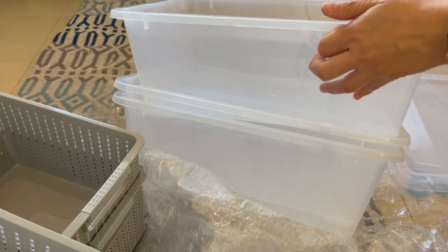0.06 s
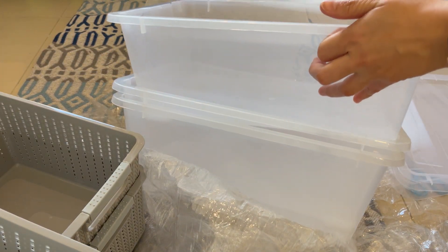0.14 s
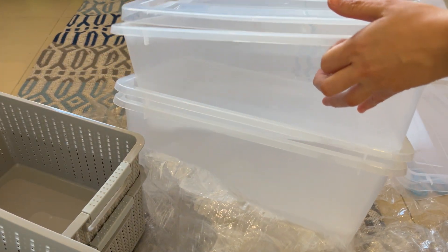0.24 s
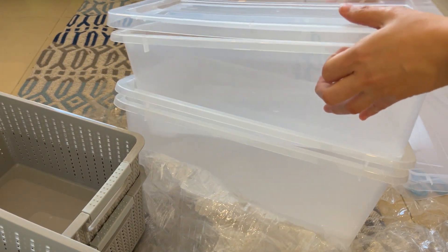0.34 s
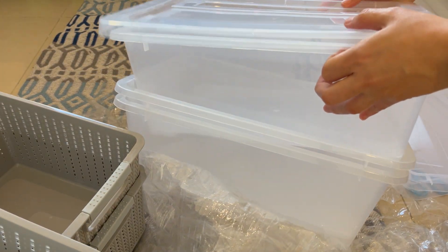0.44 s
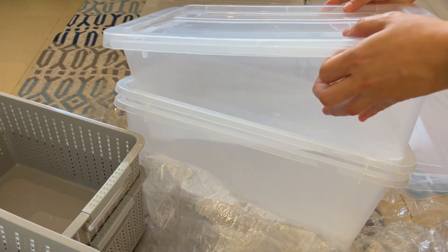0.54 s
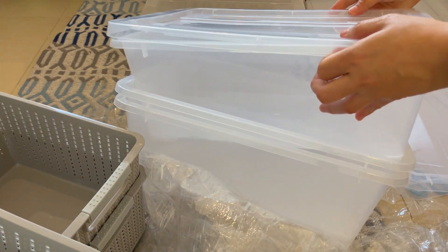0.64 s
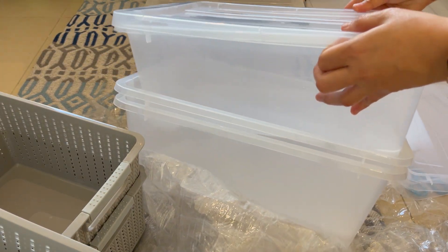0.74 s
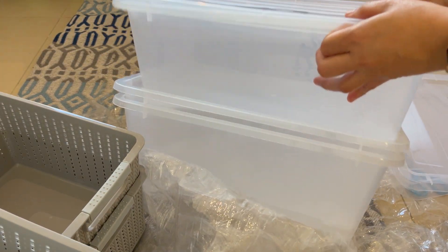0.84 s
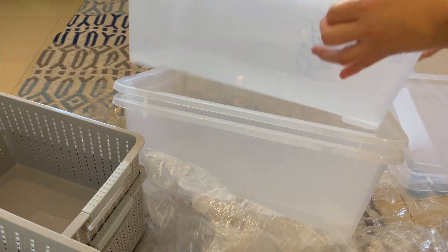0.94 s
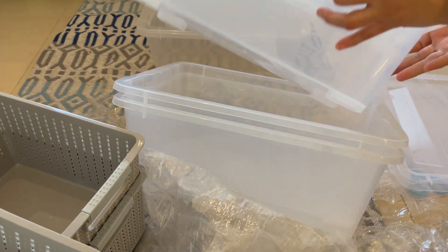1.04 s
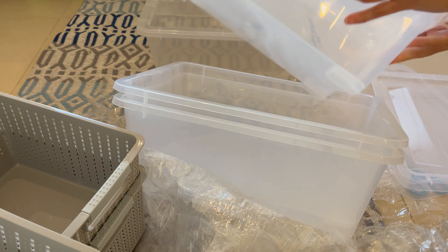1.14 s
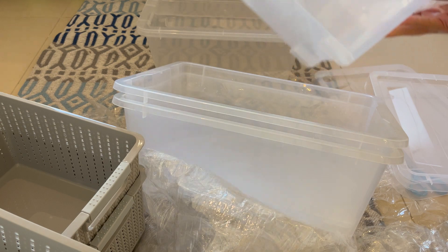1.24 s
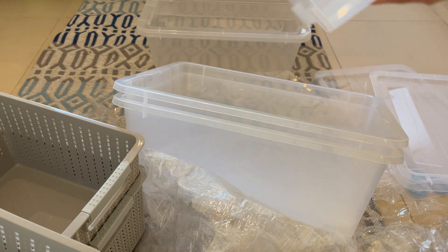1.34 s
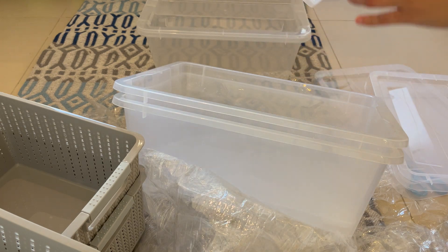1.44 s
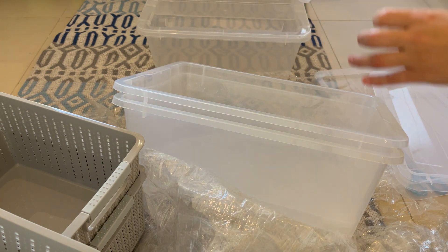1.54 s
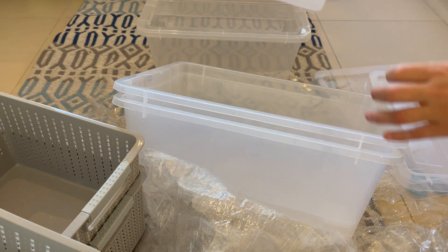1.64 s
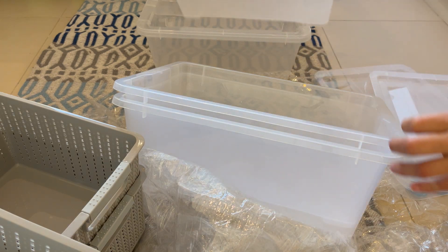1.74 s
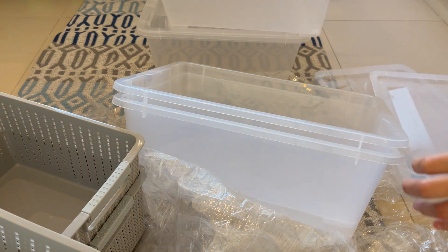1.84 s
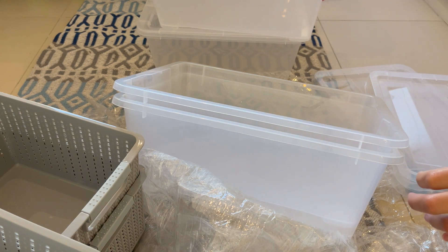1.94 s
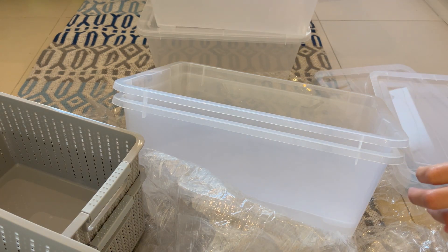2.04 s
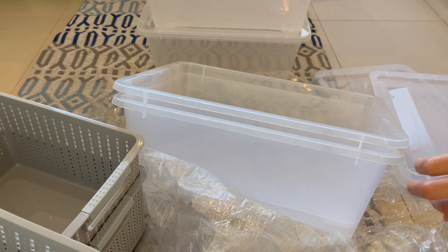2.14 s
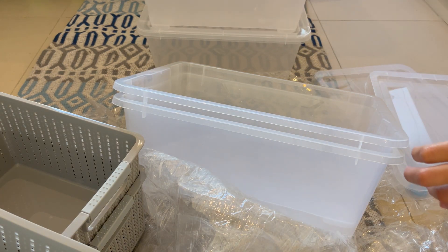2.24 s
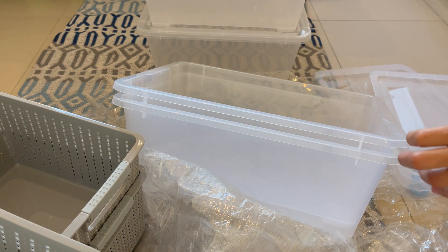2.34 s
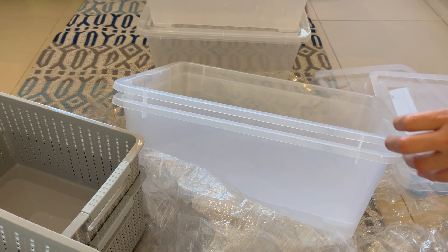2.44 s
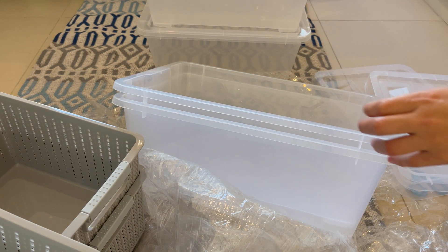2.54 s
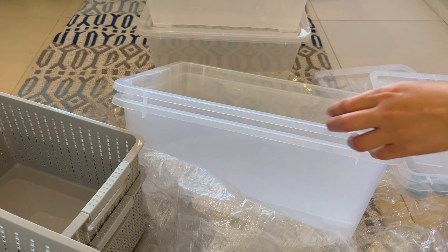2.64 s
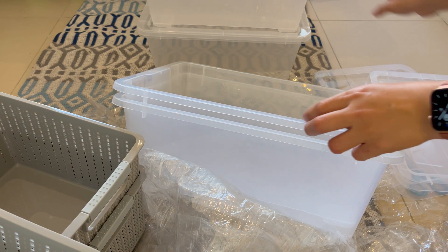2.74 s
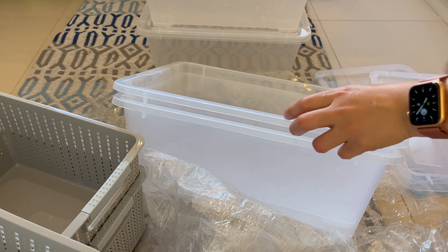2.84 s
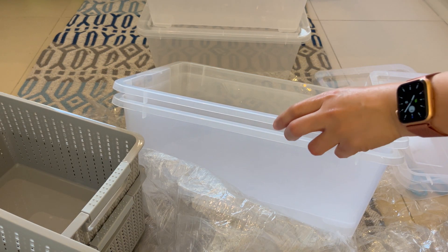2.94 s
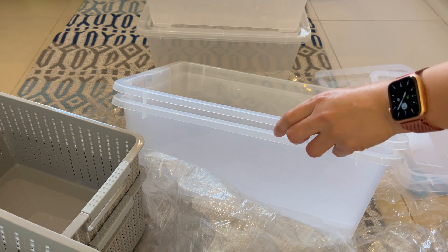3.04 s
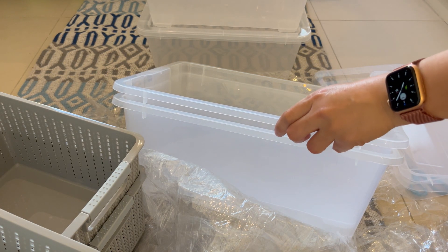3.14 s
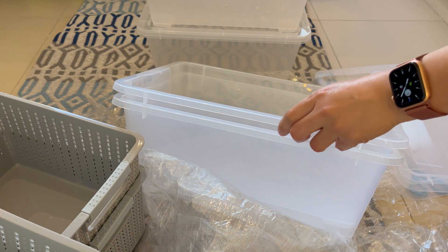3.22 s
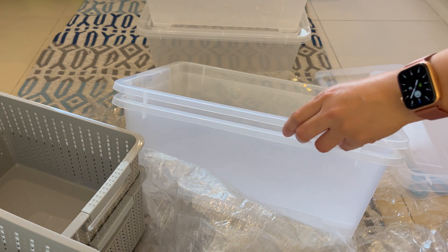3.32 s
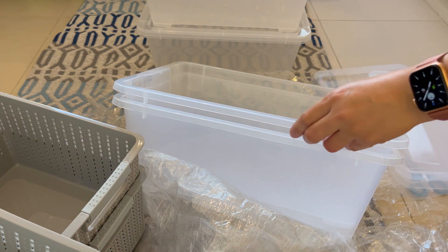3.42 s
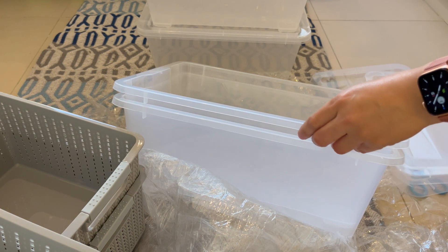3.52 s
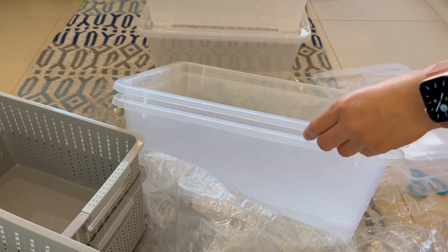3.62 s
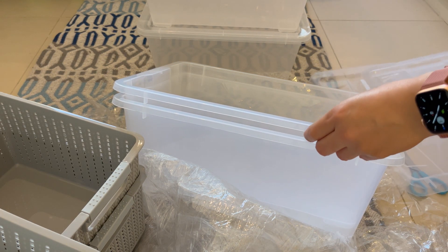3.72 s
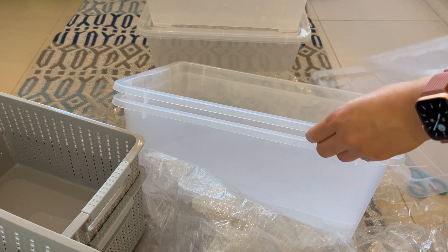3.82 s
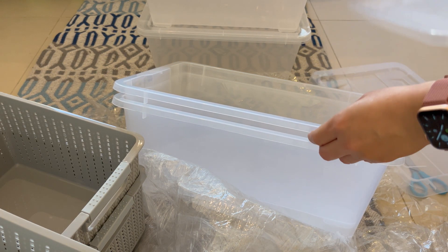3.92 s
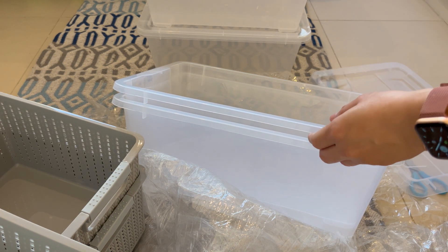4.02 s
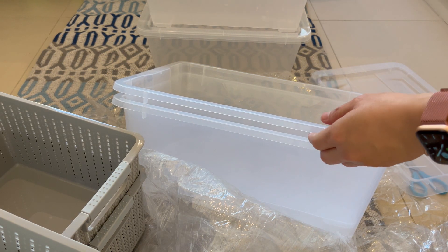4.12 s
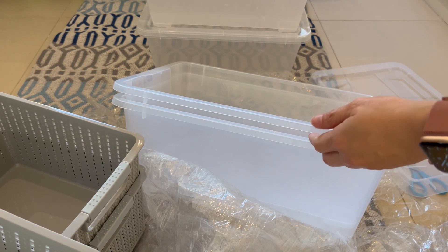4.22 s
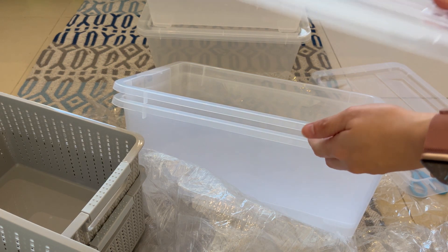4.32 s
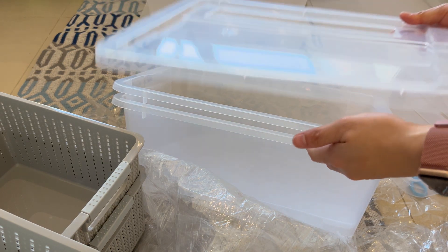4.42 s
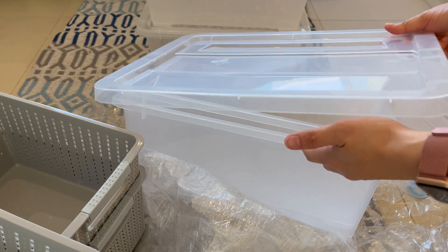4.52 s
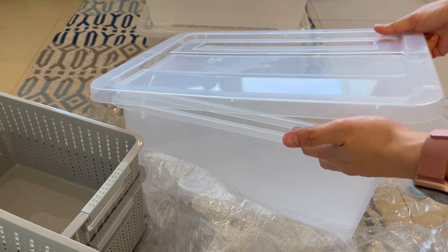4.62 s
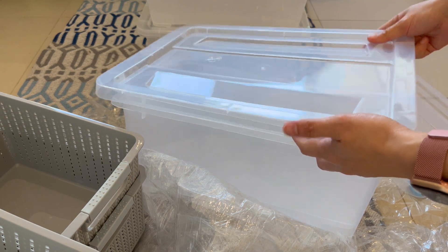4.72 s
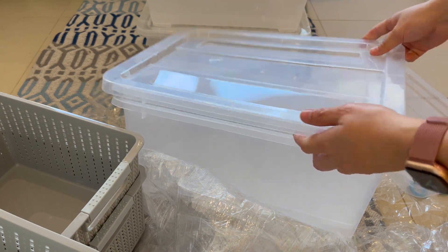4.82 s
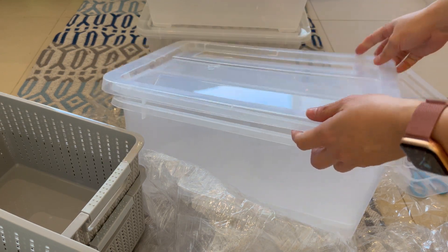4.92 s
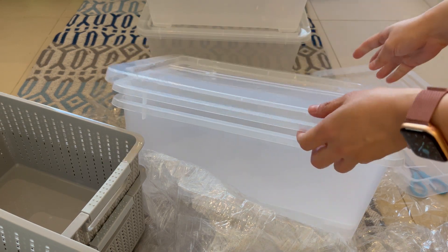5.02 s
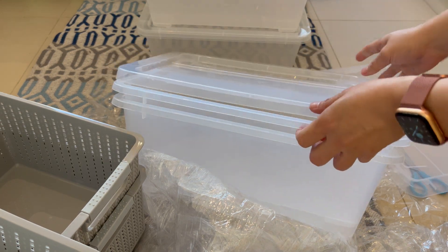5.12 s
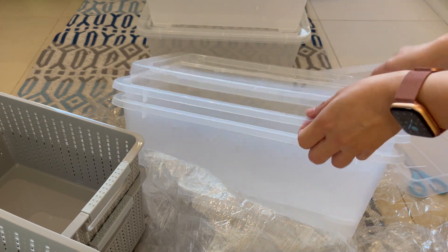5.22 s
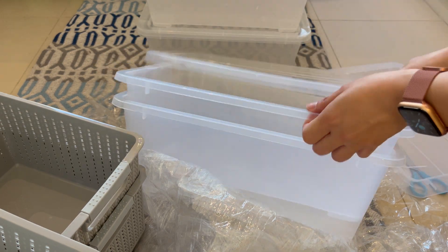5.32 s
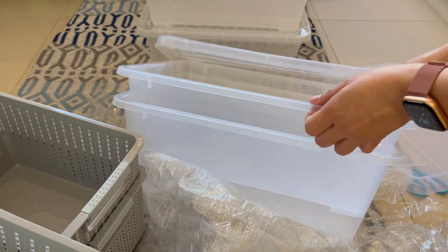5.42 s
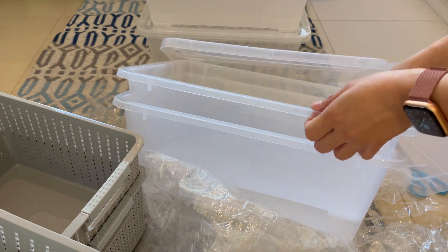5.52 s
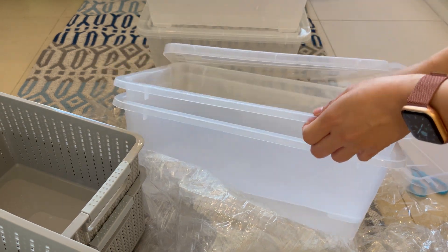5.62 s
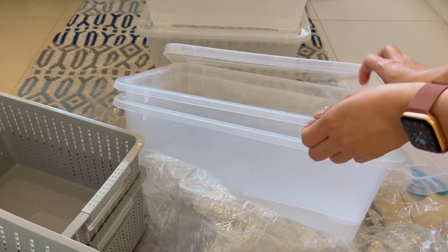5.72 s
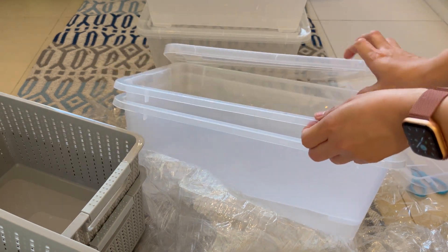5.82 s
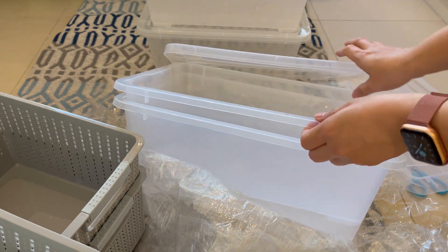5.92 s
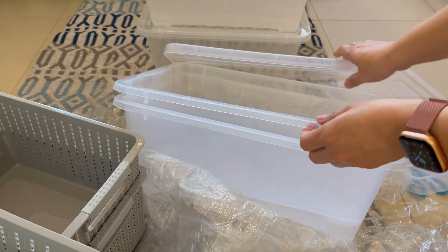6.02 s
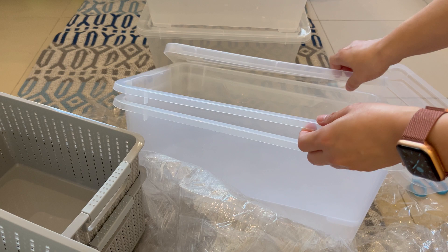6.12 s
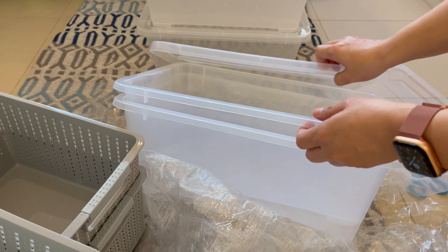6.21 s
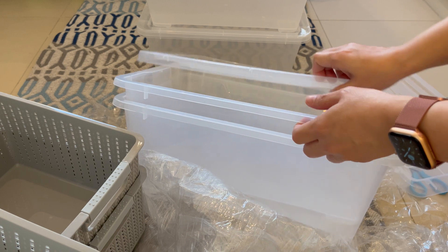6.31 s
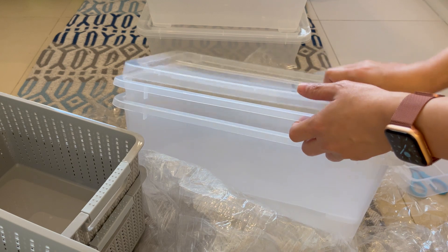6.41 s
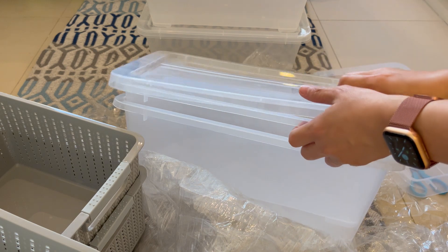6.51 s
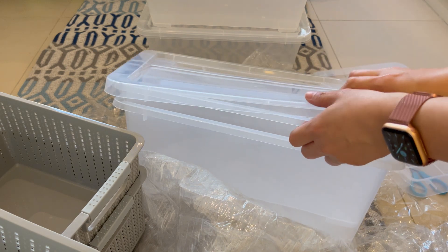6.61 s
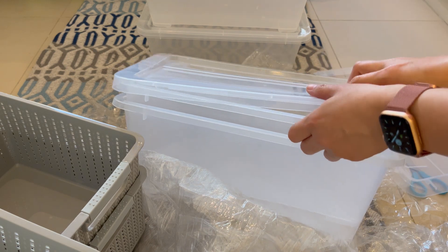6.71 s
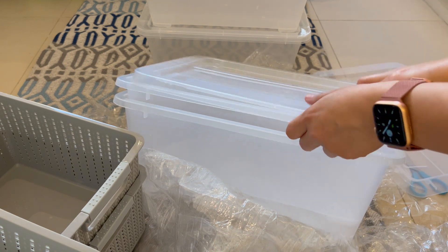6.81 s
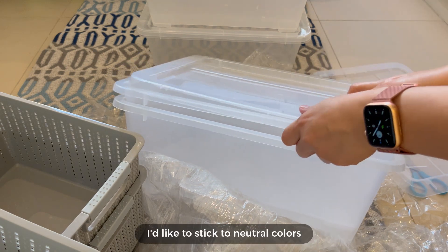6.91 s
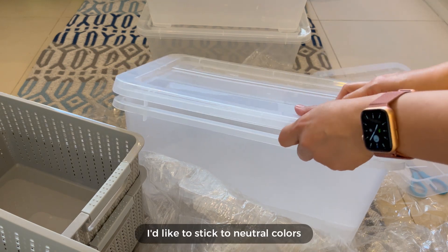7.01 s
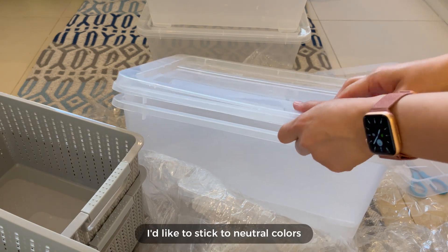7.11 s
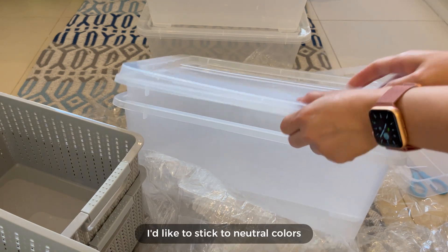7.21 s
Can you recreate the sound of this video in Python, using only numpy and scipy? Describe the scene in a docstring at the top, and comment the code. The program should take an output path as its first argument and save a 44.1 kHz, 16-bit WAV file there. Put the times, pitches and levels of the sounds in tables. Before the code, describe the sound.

Empty plastic bins are handled on the floor, heard close with a short bright room reflection. First come lid and rim clacks with dry slides, then hollow set-down booms in two groups. Quiet handling and tiny plastic wrap ticks lead to busy slapping, clicking and nesting thunks. After a short gentle slide, lids and rims snap and knock again, rattling briefly as they settle.

```python
"""Empty clear plastic storage boxes are nested, lifted out and lidded on the floor of a small hard room.
First lid and rim contacts with wrap snaps; near 1.8 s boxes are set down; near 3.1 s a dragged finger hums a wall.
From 4.5 s slaps, lid clicks and seatings crowd together; from 6.3 s lids, corners and rims close the scene.
Contacts ring modes: boom in thin walls, clack in stiff rims. Slides and wrap are noise cut into tiny snaps.
Shaped noise gives the still air; decaying noise bands give the room."""
import sys
import numpy as np
from scipy import signal
from scipy.fft import rfft, irfft
from scipy.io import wavfile

SR = 44100
rng = np.random.default_rng(int(sys.argv[2]) if len(sys.argv) > 2 else 0)


def file_out(sig):
    """Save sig as 16-bit WAV at sys.argv[1]."""
    # one column per channel
    cols = np.atleast_2d(sig).T
    # limit, then scale
    lim = np.clip(cols, -1, 1)
    pcm = np.round(lim * 32767).astype(np.int16)
    wavfile.write(sys.argv[1], SR, pcm)


N = 320166
TIME = np.arange(N) / SR
AGE = TIME[:SR // 2]   # time since a contact, s

# Levels called drive are relative: the functions add a fixed trim per layer.
# still air: f/Hz, relative density/dB
AIR_SPECTRUM = [(38, 2.5), (70, 0), (130, -10.5), (600, -29), (1200, -29.5), (1750, -19.5), (2600, -32.5),
                (8000, -44), (14500, -59.5)]
# likeness of the two ears: f/Hz, correlation/1
EAR_CORRELATION = [(100, 0.96), (280, 0.82), (550, 0.39), (4000, -0.1)]
# reverberation time: f/Hz, t60/s
ROOM_T60_S = [(4000, 0.3219), (13000, 0.26)]
# reverberation against direct sound: f/Hz, level/dB
ROOM_LEVEL_DB = [(330, -6), (800, -3), (5000, -1), (12000, -3)]
# slow modes of the whole box and its air: f/Hz, relative level/dB, t60/s
THUD_MODES = [(74, -4.5, 0.22), (114.7, 1, 0.13), (133.1, -2, 0.29), (155.8, -1.5, 0.17)]
# bending modes of the thin walls, before the grip shifts them: f/Hz, relative level/dB, t60/s
WALL_MODES = [(170.1, -3.5, 0.25), (190.2, -0.5, 0.14), (231.7, -4, 0.12), (254.3, -2, 0.14),
              (293.2, 3, 0.11), (326.1, -2, 0.13), (358.9, -1.5, 0.22), (388.4, -0.5, 0.14), (452, -5, .18),
              (508.5, -9, 0.25)]
# crowded modes of the corners: f/Hz, relative level/dB
CORNER_SPECTRUM = [(590, -1), (710, -9.5), (825, 0.5), (890, -0.5), (970, -3), (1400, -7.5)]
# crowded modes of the stiff rims: f/Hz, relative level/dB
RIM_SPECTRUM = [(1400, -5), (1620, 0.5), (2600, 0), (3500, 0.5), (4800, 3.5), (6300, -1), (7800, -7.5)]
# crowded modes of the thin edges: f/Hz, relative level/dB
EDGE_SPECTRUM = [(7800, -10), (10500, -1), (13500, -4), (15800, -32)]
# plastic scraping on plastic: f/Hz, relative level/dB
SCRAPE_SPECTRUM = [(500, 0.5), (680, -8), (900, 5.5), (1300, 3.5), (2700, -4.5), (4800, -3), (6500, -3.5),
                   (8000, -22.5)]
# single snaps of the wrap: t/s, drive/dB
WRAP_SNAPS = [(0.2788, -37.5), (0.3104, -40), (3.162, -66), (3.289, -57), (3.461, -57), (3.933, -55.5),
              (4.089, -44), (4.841, -41.5), (5.773, -57.5), (6.1326, -46)]
# stirs of the wrap as the stack shifts on it: start t/s, length/s, drive/dB
WRAP_STIRS = [(0.077, .22, -56.5), (0.758, .14, -57.5), (3.35, .36, -66), (4.128, 0.21, -77.5),
              (5.146, .11, -62.5), (7.066, .18, -60.5)]
# plastic sliding on plastic: start t/s, length/s, scrape drive/dB, pressure (rumble over scrape drive)/dB
SLIDES = [(0.107, 0.23, -46, -2.5), (0.533, 0.084, -50.5, 5.5), (0.732, .18, -50, -2.5),
          (1.008, 0.029, -71.5, 12), (1.085, 0.12, -63, 12), (1.307, 0.053, -52.5, -12),
          (1.648, 0.032, -68, 5), (1.955, 0.22, -58.5, 16.5), (2.386, 0.087, -60, 14),
          (2.825, 0.21, -63, -6.5), (3.365, 0.13, -54.5, -13.5), (3.532, 0.19, -53.5, -15),
          (3.815, 0.047, -57, -15), (4.605, 0.044, -47.5, -14), (5.163, 0.11, -51.5, 8.5),
          (5.469, 0.14, -52.5, 2.5), (6.055, 0.51, -60.5, 8.5), (6.72, .08, -45.5, -1.5),
          (6.997, 0.22, -53, -3.5)]
# contacts of box, lid and hand: t/s, force drive/dB, hardness (clack over boom drive)/dB,
# struck wall f/Hz, way of touching
CONTACTS = [(0.0162, -44.5, -3.5, 330.7, "lid"), (0.1751, -41, 8.5, 308.4, "seat"),
            (0.24, -54.5, 13.5, 338, "rim"), (0.421, -46.5, 8, 385, "tap"),
            (0.4778, -32.5, 2.5, 388, "rim"), (0.6491, -33.5, -2.5, 181, "rim"),
            (0.709, -58, -17, 241, "rim"), (1.351, -63.5, 7, 328.4, "flex"),
            (1.7932, -28, -3.5, 240, "drop"), (1.854, -30, -5.5, 309.1, "drop"),
            (1.9223, -36.5, -9.5, 155.7, "seat"), (2.1681, -27, -5, 250.4, "drop"),
            (2.2497, -28, -1.5, 258.3, "drop"), (2.36, -36.5, 2.5, 325.6, "slap"),
            (2.753, -69.5, 8, 327, "corner"), (2.9615, -52.5, 1.5, 265.7, "corner"),
            (3.7792, -68, 22.5, 426, "tap"), (4.4974, -35, 0, 196.8, "slap"), (4.58, -57.5, 12, 327, "lid"),
            (4.7, -44, 8.5, 282, "lid"), (4.7494, -43, 6, 350.6, "lid"), (4.771, -47.5, 8, 304, "corner"),
            (4.8545, -38, -10, 361.7, "slap"), (4.875, -40.5, 1.5, 324, "slap"),
            (4.978, -45.5, 6, 348, "slap"), (5.0308, -26, 3.5, 227.3, "slap"),
            (5.1056, -36.5, -0.5, 318, "flex"), (5.1853, -50, 5.5, 270, "tap"),
            (5.2662, -39.5, 2.5, 283, "rim"), (5.3437, -28.5, -6, 250.5, "seat"),
            (5.403, -40, 5, 150, "tap"), (5.4264, -48.5, 15.5, 427, "tap"), (5.455, -37, 0, 252, "seat"),
            (5.551, -55, 7, 324, "tap"), (5.63, -44, -3.5, 190.8, "rim"), (6.2632, -38, 6, 235, "lid"),
            (6.3945, -38, 9, 311.4, "lid"), (6.4602, -40.5, -2.5, 280, "flex"),
            (6.4952, -32, 1.5, 296.6, "corner"), (6.6923, -54, 3, 171, "corner"),
            (6.76, -44.5, -4, 295, "rim"), (6.819, -30, 3.5, 354.5, "lid"),
            (6.8509, -33.5, -28, 293, "rim"), (6.9101, -44, 6.5, 299, "rim"),
            (6.9669, -36.5, 1.5, 184, "rim"), (7.219, -50.5, 2, 309.4, "lid")]
# ways of touching: rim centre f/Hz; floor thud, corner knock, edge tick drive over wall boom/dB;
# first crack, graze drive over clack/dB; clack left minus right/dB
# rim: rim on rim; drop: box set on floor; seat: box drops home in the stack; slap: lid lands flat;
# lid: lid edge clicks on rim; corner: corner catches; flex: pressed corner gives way; tap: stiff lip tapped
TOUCHES = {"rim": (1613.5, -8.5, -7, -20, -16, -22.5, 4), "drop": (1567, -8, -7, -22, -13, -17, 4.5),
           "seat": (1581, -3, -4.5, -12.5, -10.5, -26, 3.5),
           "slap": (2543.5, -15.5, -4, -19, -9.5, -28, 0.5), "lid": (2898, -5, -4.5, -18, -14, -20.5, 1),
           "corner": (1749.5, -8, -3.5, -20, -17.5, -17.5, 5),
           "flex": (1600, -9.5, 2.5, -19.5, -14, -24, 0), "tap": (2201, -5.5, 2, -18, -8.5, -35, 1)}

AIR_DB, CUTOFF_HZ = -69.5, 16000
CORNER_FOLLOWS, EDGE_FOLLOWS = 0.11, 0.88   # share of hardness/dB reaching corners and thin edges
SLIDE_BUILD, SLIDE_RELEASE_S = 0.17, 0.02   # build-up time as share of length
STIR_BUILD, STIR_RELEASE_S = 0.33, 0.01
CATCHES_PER_S, CATCH_T60_AT_1KHZ_S, CATCH_SPREAD_DB, CATCH_DB = 70, 0.03, 9, -14.5
HISS_DB = -24
RATTLE_DB, RATTLE_DELAY_S, RATTLE_DECAY_S = -19, 0.012, 0.046


def from_db(db):
    """Decibels to gain."""
    return 10 ** (np.asarray(db) / 20)


def rms_one(x):
    """Scale to unit power."""
    return x / np.sqrt(np.mean(x ** 2) + 1e-20)


def at_hz(points, hz):
    """Read a table on a log-frequency axis."""
    points = np.array(points)
    return np.interp(np.log(np.maximum(hz, 1)), np.log(points[:, 0]), points[:, 1])


def add(out, start_s, sound):
    """Lay a short sound into the scene."""
    start = int(np.clip(start_s * SR, 0, N))
    out[:, start:start + len(AGE)] += sound[:, :N - start]


def white():
    """Two unrelated noises."""
    return rng.standard_normal((2, N))


def two_ears(mid, side, hz):
    """Mix two unrelated signals to the ear correlation at this frequency."""
    alike = np.clip(at_hz(EAR_CORRELATION, hz), -1, 1)
    mid = np.sqrt((1 + alike) / 2) * mid
    side = np.sqrt((1 - alike) / 2) * side
    return np.array([mid + side, mid - side])


def coloured(pair, spectrum):
    """Give two noises a spectrum with steep ends and spread them over the ears; rms 1."""
    hz = np.fft.rfftfreq(N, 1 / SR) + 1
    low_end = 1 + (spectrum[0][0] / hz) ** 16
    high_end = 1 + (hz / spectrum[-1][0]) ** 16
    mid, side = rfft(pair) * from_db(at_hz(spectrum, hz)) / np.sqrt(low_end * high_end)
    return rms_one(irfft(two_ears(mid, side, hz), N))


def swells(start_s, length_s, db, build, release_s):
    """Gain of movements that build up, hold and fade; long ones build up more slowly."""
    coarse_s = TIME[::50]
    age = np.maximum(coarse_s - start_s[:, None], 0)
    length_s = length_s[:, None]
    rise = 1 - np.exp(-age / (build * length_s))
    fade = np.exp(-np.clip((age - length_s) / release_s, 0, 20))
    gains = np.atleast_2d(from_db(db) @ (rise * fade))
    return np.array([np.interp(TIME, coarse_s, gain) for gain in gains])


def slips(per_s, spread_db, decay_s, smooth):
    """Strength of stick and slip: tiny snaps of uneven size over an even rub; rms 1."""
    hits = from_db(spread_db * rng.random(N)) * (rng.random(N) < per_s / SR)
    power = signal.lfilter([1], [1, -np.exp(-2 / (decay_s * SR))], hits ** 2 + 1e-18)
    return rms_one(np.sqrt(power / power.mean() + abs(smooth)))


def air():
    """Still air: steady shaped noise."""
    return from_db(AIR_DB) * coloured(white(), AIR_SPECTRUM)


def room(x):
    """Diffuse reflections: noise bands about an octave wide, each with its own decay."""
    tail, edges_hz = 0, np.geomspace(60, 16000, 9)
    age = TIME[:SR * 3 // 4]
    for low, high in zip(edges_hz, edges_hz[1:]):
        hz = np.sqrt(low * high)
        bandpass = signal.butter(3, [low, high], "band", fs=SR, output="sos")
        noise = signal.sosfilt(bandpass, rng.standard_normal((2, len(age))))
        decay = from_db(-60 * age / at_hz(ROOM_T60_S, hz))
        onset = 1 - np.exp(-(age / 0.0037) ** 2)
        band = rms_one(two_ears(*noise, hz) * decay * onset)
        share = np.sqrt(2 * (high - low) / SR / len(age))   # energy in proportion to bandwidth
        tail = tail + band * share * from_db(at_hz(ROOM_LEVEL_DB, hz))
    return signal.fftconvolve(x, tail, axes=1)[:, :N]


def rubbed_wall(start_s=3.07, stop_s=3.156, rise_s=0.0048, t60_s=0.26, hz=171, level_db=-51.5, octave_db=-11):
    """A dragging finger feeds the lowest wall mode; its octave sounds while the finger first grips."""
    age = np.maximum(TIME - start_s, 0)
    rise = 1 - np.exp(-age / rise_s)
    fade = from_db(-60 * np.maximum(TIME - stop_s, 0) / t60_s)
    octave = from_db(octave_db) * np.exp(-age / 0.031) * np.sin(4 * np.pi * hz * age)
    hum = np.sin(2 * np.pi * hz * age) + octave
    return np.sqrt(2) * from_db(level_db) * rise * fade * hum


def wrap_snaps(decay_s=0.002, bright_db=-7, dull_db=-4, settling_db=-85):
    """A crease in the wrap flips over with a tiny bright crack; fainter ones keep settling throughout."""
    settling = slips(per_s=14.0, spread_db=2.5, decay_s=decay_s, smooth=0)
    burst = from_db(settling_db) * settling * np.ones((2, 1))
    for start_s, db in WRAP_SNAPS:
        add(burst, start_s, from_db(db) * np.exp(-AGE / decay_s)[None])
    bright = from_db(bright_db) * coloured(white(), EDGE_SPECTRUM)
    dull = from_db(dull_db) * coloured(white(), SCRAPE_SPECTRUM)
    return burst * (bright + dull)


def wrap_rustling(bright_db=-6, dull_db=-9):
    """Stirred wrap crinkles in dense tiny cracks."""
    stir = swells(*np.transpose(WRAP_STIRS), STIR_BUILD, STIR_RELEASE_S)
    grain = slips(per_s=190, spread_db=36.5, decay_s=0.0017, smooth=0.083)
    bright = from_db(bright_db) * coloured(white() * grain, EDGE_SPECTRUM)
    dull = from_db(dull_db) * coloured(white() * grain, SCRAPE_SPECTRUM)
    return stir * (bright + dull)


def catches(count=16):
    """Rims catch and let go: random small clacks, each weighting the resonators anew; rms 1."""
    clicks = from_db(CATCH_SPREAD_DB * rng.random(N)) * (rng.random(N) < CATCHES_PER_S / SR)
    at, out = np.flatnonzero(clicks), 0
    for hz in np.geomspace(560, 5000, count) * rng.uniform(0.96, 1.04, count):
        t60_s = CATCH_T60_AT_1KHZ_S * np.sqrt(1000 / hz)
        r, w = from_db(-60 / (t60_s * SR)), 2 * np.pi * hz / SR   # pole radius, angle
        strengths = two_ears(*rng.standard_normal((2, len(at))), hz)
        drive = np.full((2, N), 1e-18)
        drive[:, at] = strengths * clicks[at] * rng.random(len(at)) ** 2
        out = out + signal.lfilter([np.sin(w), -np.sin(w)], [1, -2 * r * np.cos(w), r * r], drive) / w
    return rms_one(out)


def hollow_body(damped_hz=9):
    """Spectrum of the box's low modes, widened by the hands that hold it: f/Hz, level/dB."""
    hz = np.geomspace(50, 560, 200)
    power = sum(from_db(db) ** 2 / (1 + ((hz - centre_hz) / damped_hz) ** 2)
                for centre_hz, db, _ in THUD_MODES + WALL_MODES)
    return np.transpose([hz, 10 * np.log10(power)])


def sliding(clacks, scrape_trim_db=-11.0, rumble_trim_db=-3):
    """Grainy scrape and hiss with small catches; the harder the press, the more the hollow walls shake."""
    start_s, length_s, scrape_db, pressure_db = np.transpose(SLIDES)
    drives_db = [scrape_db, scrape_db + pressure_db]
    scrape_gain, rumble_gain = swells(start_s, length_s, drives_db, SLIDE_BUILD, SLIDE_RELEASE_S)
    grain = slips(per_s=170, spread_db=20, decay_s=0.0029, smooth=0.17)
    scrape = from_db(scrape_trim_db) * coloured(white() * grain, SCRAPE_SPECTRUM)
    hiss = from_db(HISS_DB) * coloured(white() * grain, EDGE_SPECTRUM)
    rumble = from_db(rumble_trim_db) * coloured(white() * grain, hollow_body())
    return scrape_gain * (scrape + from_db(CATCH_DB) * clacks + hiss) + rumble_gain * rumble


def rattling(clacks):
    """Each contact leaves lids and rims rattling for a moment, driven by force and hardness."""
    jolts = np.zeros(N)
    for start_s, force_db, hardness_db, *_ in CONTACTS:
        at = min(int((start_s + RATTLE_DELAY_S) * SR), N - 1)
        jolts[at] += from_db(force_db + hardness_db + RATTLE_DB)
    decay = np.exp(-1 / (RATTLE_DECAY_S * SR))
    return clacks * signal.lfilter([1], [1, -decay], jolts + 1e-18)


def strike(strengths, hz, t60_s, contact_s):
    """Ring modes once per blow (complex strengths: ears x blows x modes); first 20 ms at rms 1."""
    age = AGE[:int((np.max(t60_s) + 0.02) * SR)]
    rings = np.exp(2j * np.pi * np.outer(hz, age)) * from_db(-60 * age / t60_s[:, None])
    blows = (strengths @ rings).imag * (1 - np.exp(-(age / contact_s) ** 2))
    blows = blows / np.sqrt(np.mean(blows[..., :SR // 50] ** 2, axis=(0, 2), keepdims=True))
    return np.pad(blows, [(0, 0), (0, 0), (0, len(AGE) - len(age))])


def panel(modes, favour_db, scatter_db, contact_s):
    """Low modes swing together as the push peaks, with strengths varying from blow to blow."""
    hz, db, t60_s = np.transpose(modes)
    chance = rng.standard_normal((len(CONTACTS), len(hz), 4))
    size = from_db(db + favour_db + scatter_db * chance[..., 0])
    mid = size * np.exp(1j * (chance[..., 1] - 2 * np.pi * hz * contact_s))
    side = size * (chance[..., 2] + 1j * chance[..., 3]) / np.sqrt(2)
    return strike(two_ears(mid, side, hz), hz, t60_s, contact_s)


def crowd(spectrum, lowest_t60_s, contact_s, count, centre_hz=None, focus_db=7.0, scatter_db=2):
    """Many close modes, new strengths at every blow, lifted near any given centre; higher ones die sooner."""
    place = (np.arange(count) + rng.random(count)) / count
    hz = spectrum[0][0] * (spectrum[-1][0] / spectrum[0][0]) ** place
    db = at_hz(spectrum, hz) + scatter_db * rng.standard_normal((len(CONTACTS), count))
    if centre_hz is not None:
        octaves_off = np.abs(np.log2(hz / centre_hz[:, None]))
        db = db + focus_db * np.exp(-octaves_off / 0.22)
    turns = rng.random((len(CONTACTS), count, 2))
    mid, side = np.moveaxis(np.exp(2j * np.pi * turns), 2, 0) * from_db(db)
    return strike(two_ears(mid, side, hz), hz, lowest_t60_s * np.sqrt(hz[0] / hz), contact_s)


def gripped(blows, stretch):
    """The grip of the hands stiffens or slackens a wall: each blow rings a little higher or lower."""
    return np.array([[np.interp(AGE * faster, AGE, blow) for blow, faster in zip(ear, stretch)]
                     for ear in blows])


def contacts(graze_s=0.008, rebound_s=0.012, rebound_db=-14):
    """Every contact: a graze, tick and crack at the edge, a rim clack, then the slower wall boom."""
    start_s, wall_db, hardness_db, wall_hz = np.transpose([row[:4] for row in CONTACTS])
    touches = np.transpose([TOUCHES[row[4]] for row in CONTACTS])
    rim_hz, thud_db, corner_db, edge_db, crack_db, graze_db, pan_db = touches
    rim_db = wall_db + hardness_db
    sides = from_db(np.array([pan_db, -pan_db]) / 2)[..., None]

    mode_hz = np.array(WALL_MODES)[:, 0]
    octaves_off = np.abs(np.log2(mode_hz / wall_hz[:, None]))
    favour_db = 11 * np.exp(-octaves_off / 0.089)   # favours the wall that is hit
    stretch = wall_hz / mode_hz[octaves_off.argmin(axis=1)]

    # loose rims chatter on each other as they ring
    chatter = slips(per_s=240, spread_db=6, decay_s=0.009, smooth=0.78)
    chatter = np.take(chatter, ((start_s[:, None] + AGE) * SR).astype(int), mode="wrap")

    thud = panel(THUD_MODES, 0, scatter_db=6.5, contact_s=0.00717)
    boom = gripped(panel(WALL_MODES, favour_db, scatter_db=1.0, contact_s=0.00408), stretch)
    knock = crowd(CORNER_SPECTRUM, lowest_t60_s=0.077, contact_s=0.0013, count=40)
    clack = crowd(RIM_SPECTRUM, lowest_t60_s=0.075, contact_s=0.0018, count=300, centre_hz=rim_hz)
    crack = crowd(RIM_SPECTRUM, lowest_t60_s=0.016, contact_s=0.0016, count=45, centre_hz=rim_hz)
    tick = crowd(EDGE_SPECTRUM, lowest_t60_s=0.021, contact_s=0.00024, count=200)
    graze = crowd(SCRAPE_SPECTRUM, lowest_t60_s=0.07, contact_s=0.002, count=160)

    parts = [(wall_db + thud_db, thud),
             (wall_db + 0.5, boom),
             (wall_db + corner_db + CORNER_FOLLOWS * hardness_db - 4.5, knock),
             (rim_db - 14, sides * chatter * clack),
             (rim_db + crack_db, sides * crack),
             (wall_db + edge_db + EDGE_FOLLOWS * hardness_db - 7.0, tick)]
    blows = sum(from_db(db)[:, None] * sound for db, sound in parts)
    grazes = from_db(rim_db + graze_db)[:, None] * graze

    out = np.zeros((2, N))
    for k, when_s in enumerate(start_s):
        add(out, when_s - graze_s, grazes[:, k])   # flexing rims brush before they meet squarely
        add(out, when_s, blows[:, k])
        bounce_s = when_s + rebound_s * rng.uniform(0.5, 2)
        add(out, bounce_s, from_db(rebound_db) * blows[:, k])   # the light box bounces
    return out


def scene():
    """The boxes and wrap in their room, the hum of one wall, and still air."""
    clacks = catches()
    boxes = contacts() + rattling(clacks) + sliding(clacks) + wrap_rustling() + wrap_snaps()
    return boxes + room(boxes) + rubbed_wall() + air()


def record(dry):
    """Cut the top steeply with an elliptic low-pass."""
    lowpass = signal.ellip(10, 0.1, 80, CUTOFF_HZ, fs=SR, output="sos")
    return signal.sosfilt(lowpass, dry)


dry = scene()
out = record(dry)
file_out(out)
```